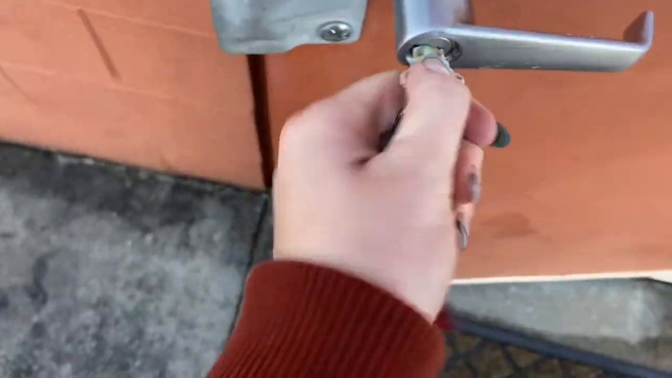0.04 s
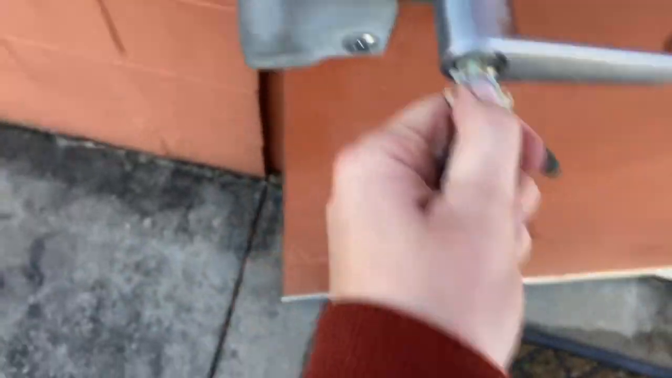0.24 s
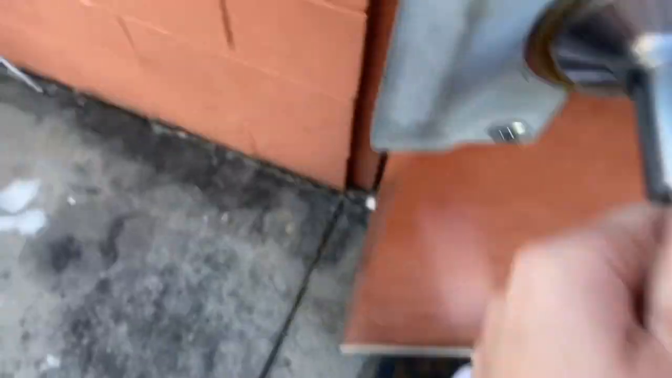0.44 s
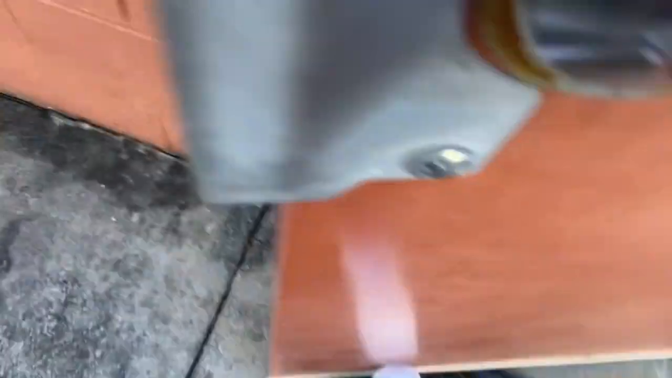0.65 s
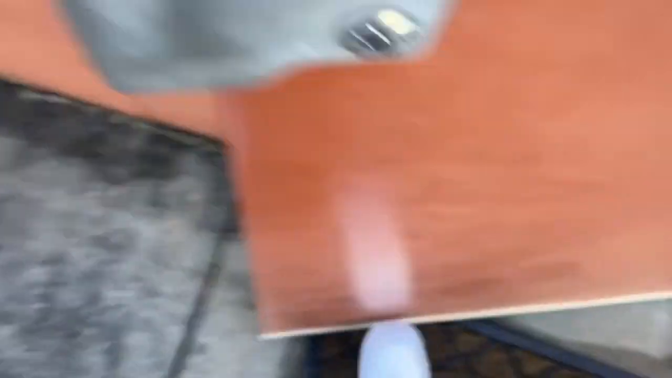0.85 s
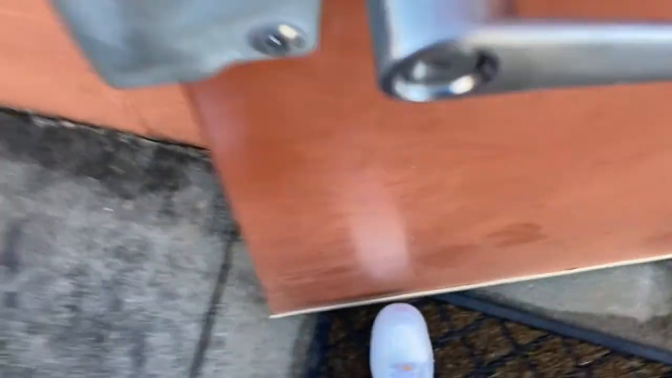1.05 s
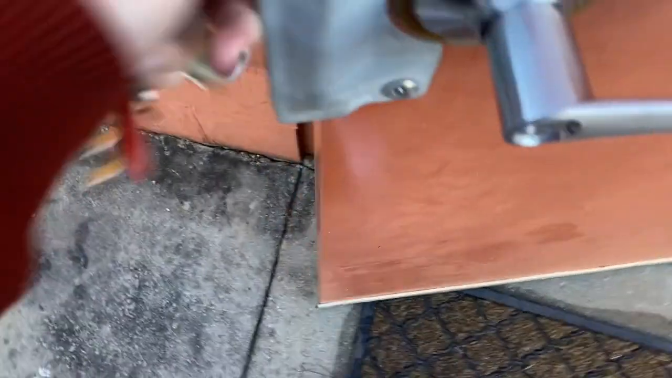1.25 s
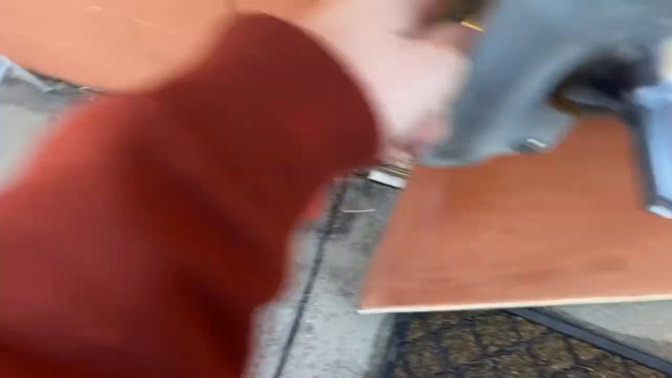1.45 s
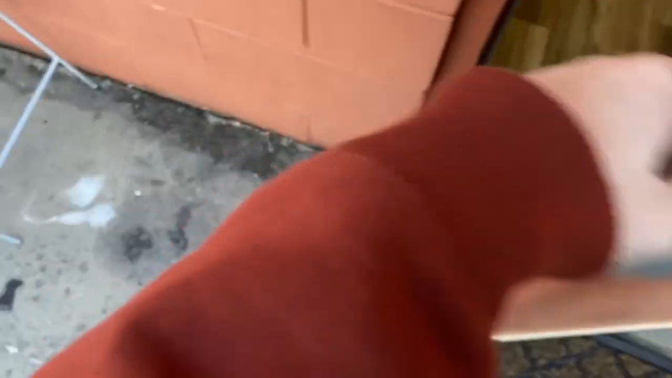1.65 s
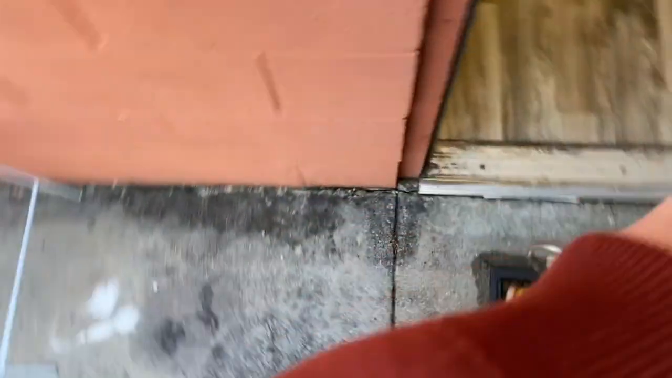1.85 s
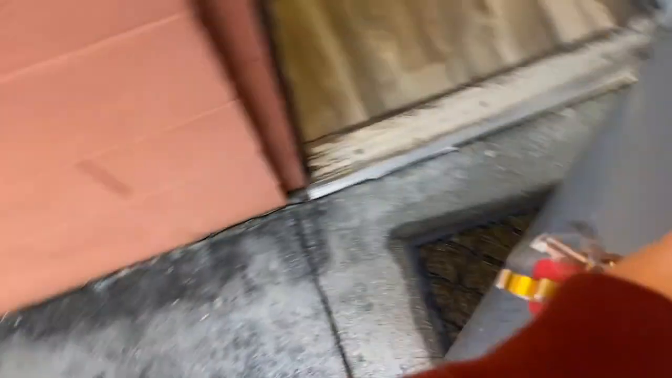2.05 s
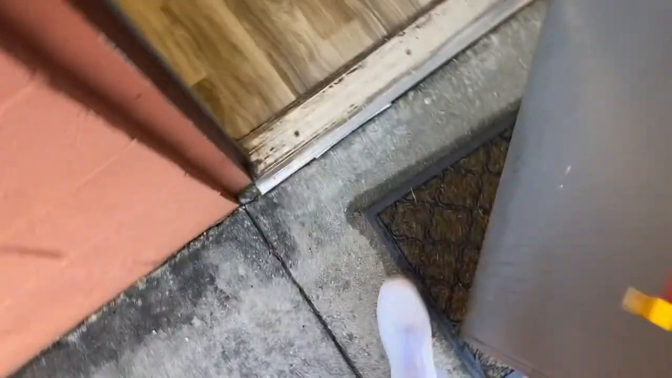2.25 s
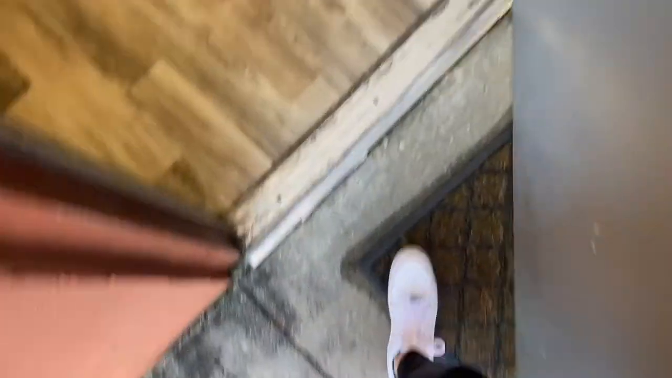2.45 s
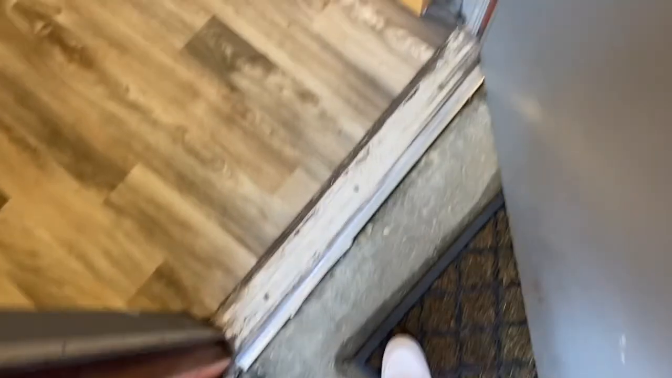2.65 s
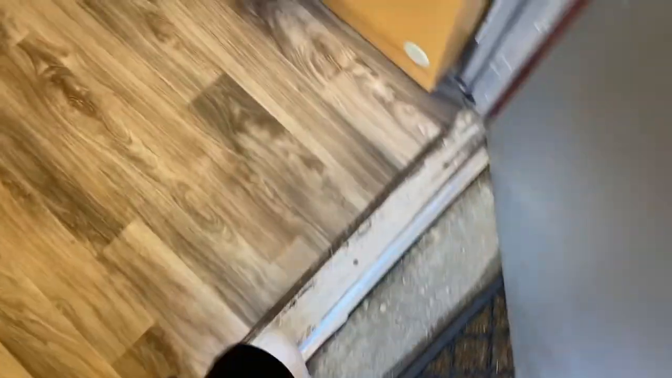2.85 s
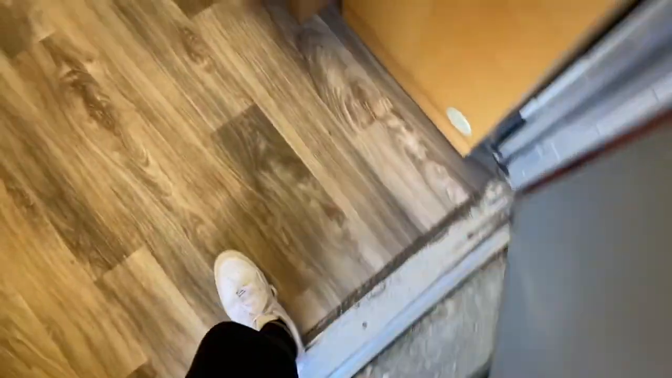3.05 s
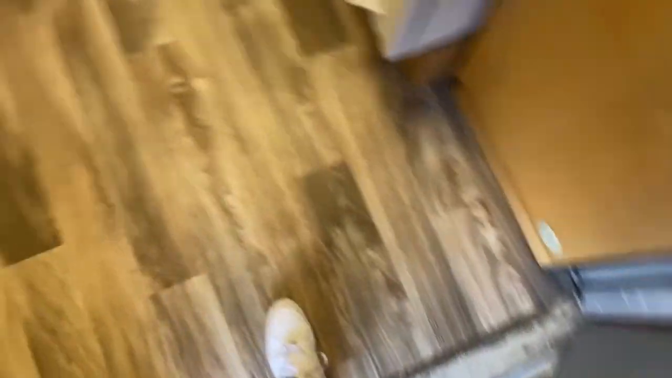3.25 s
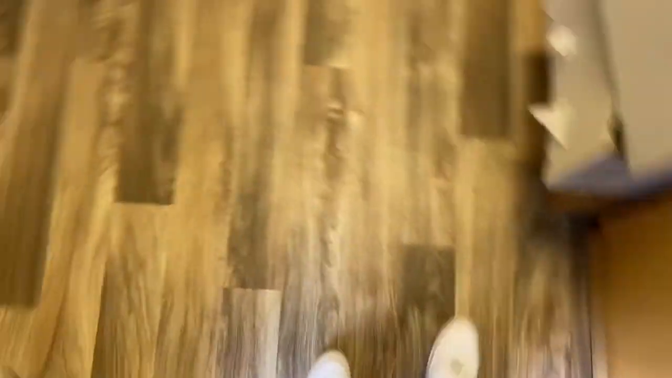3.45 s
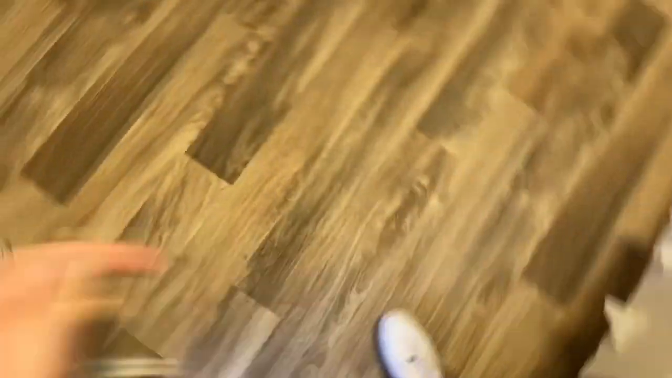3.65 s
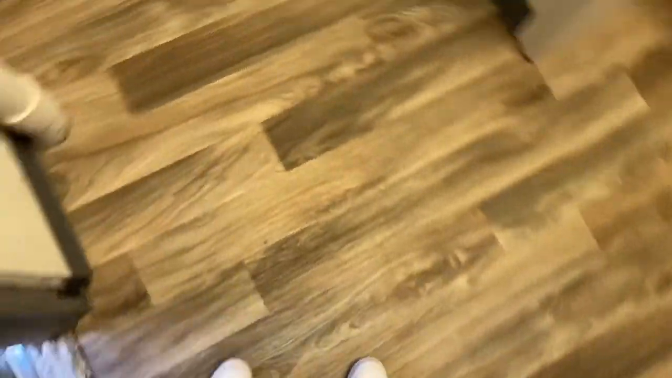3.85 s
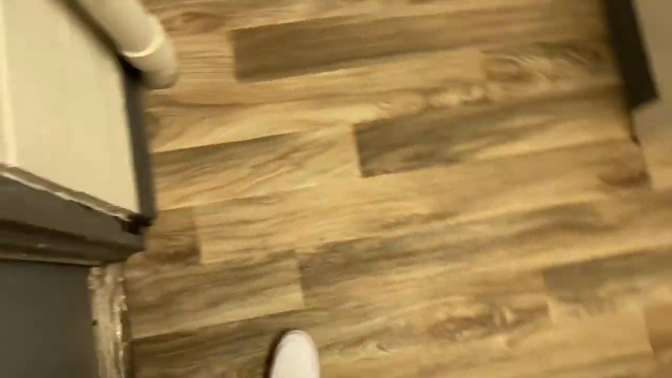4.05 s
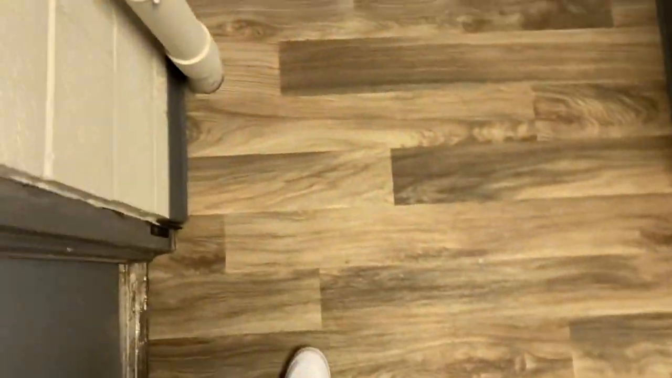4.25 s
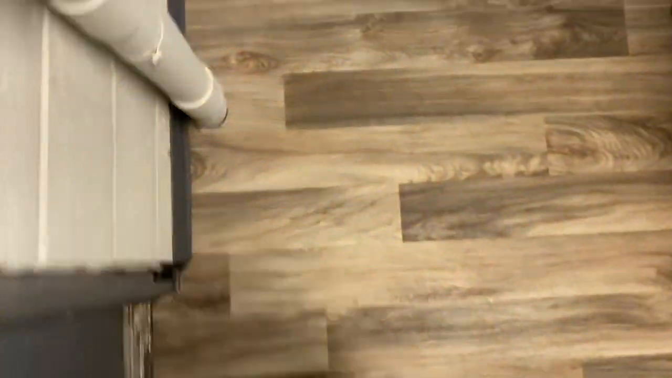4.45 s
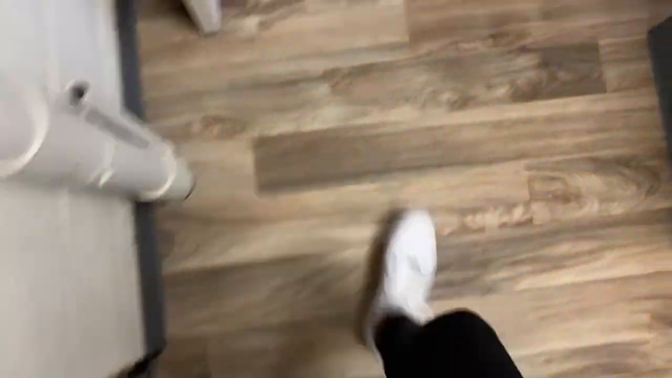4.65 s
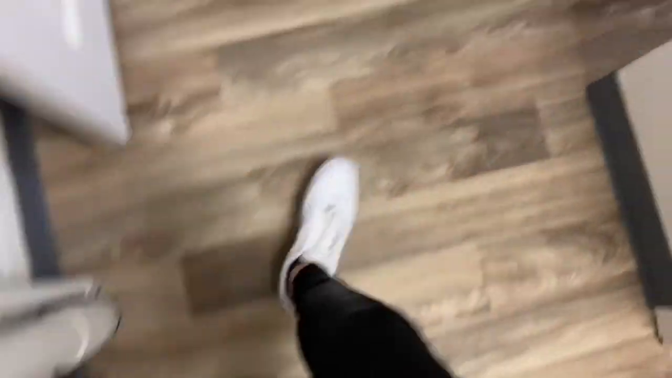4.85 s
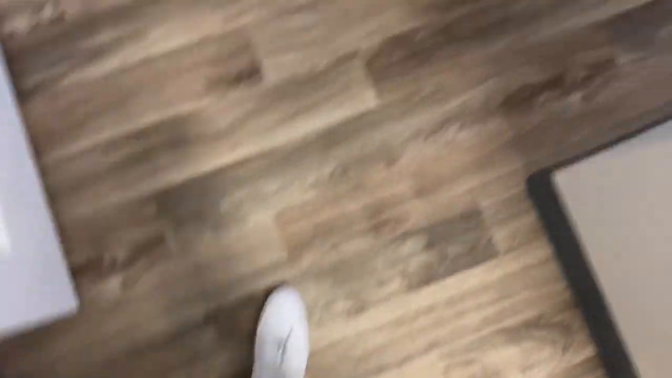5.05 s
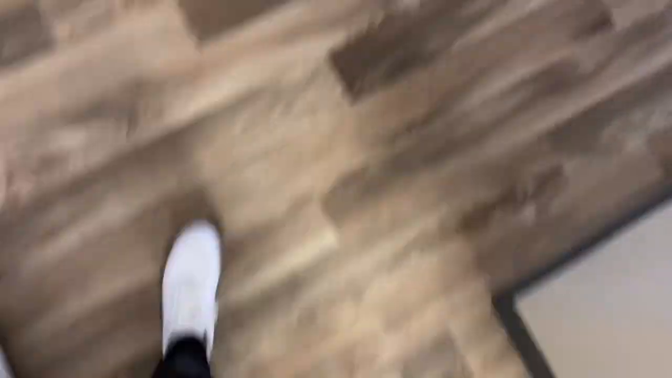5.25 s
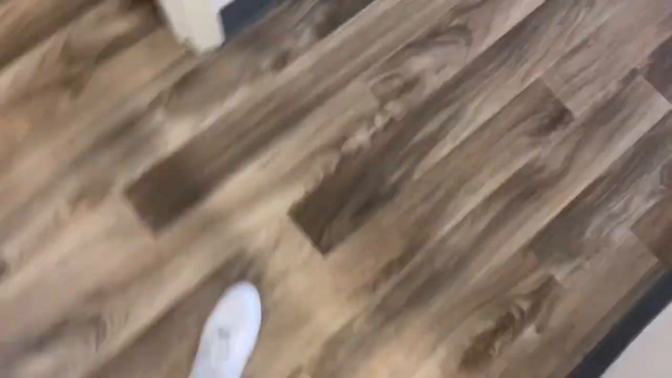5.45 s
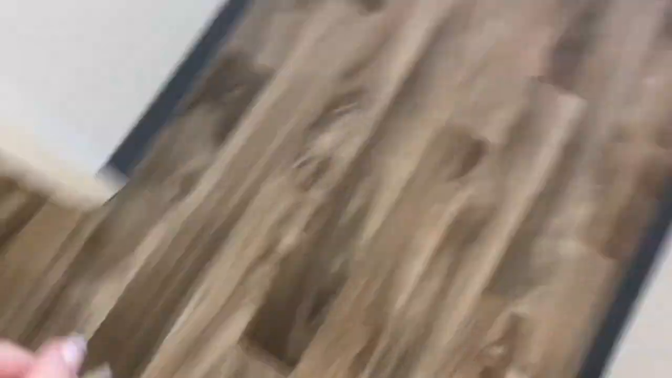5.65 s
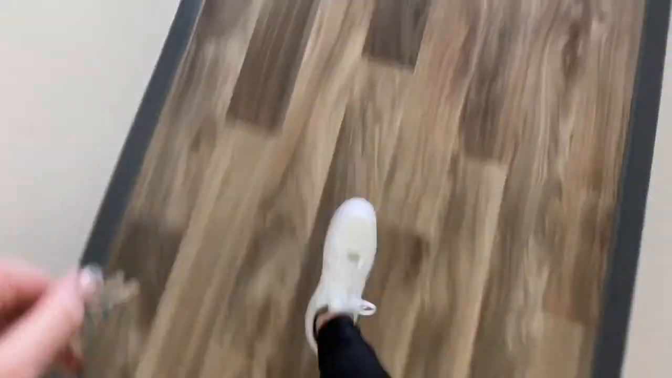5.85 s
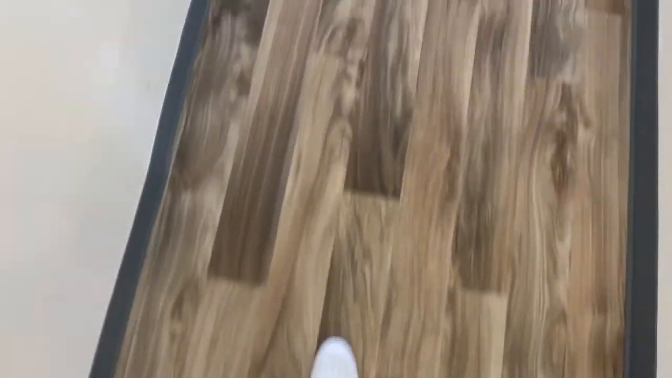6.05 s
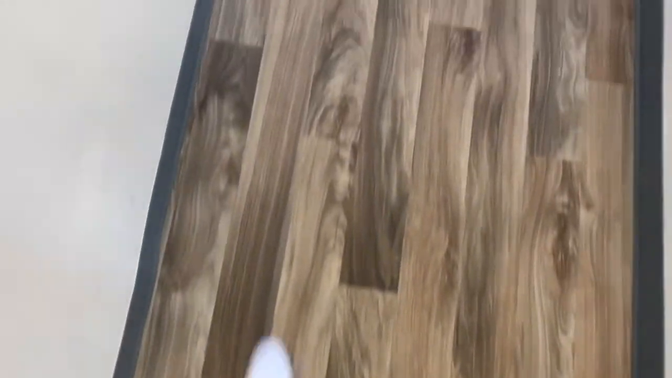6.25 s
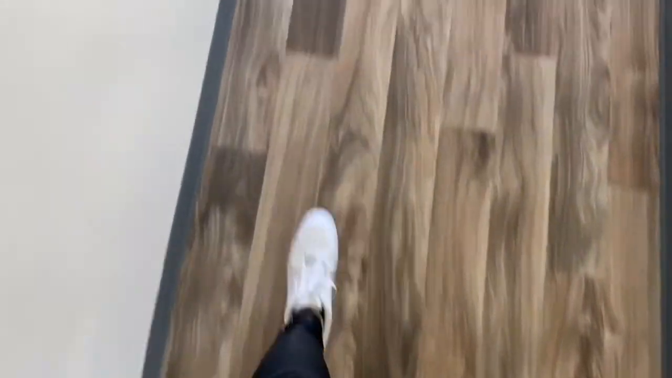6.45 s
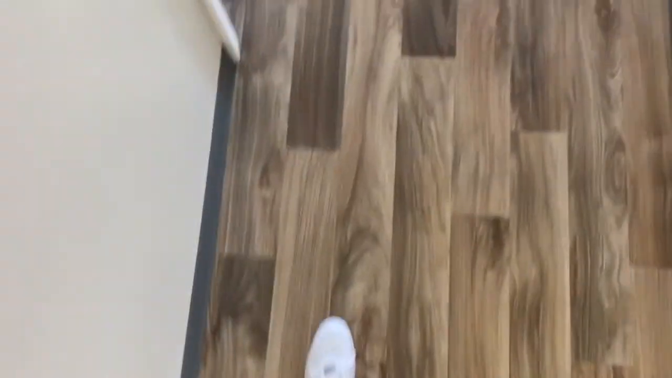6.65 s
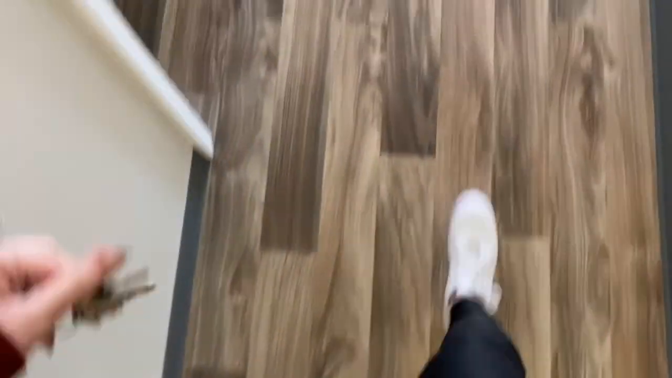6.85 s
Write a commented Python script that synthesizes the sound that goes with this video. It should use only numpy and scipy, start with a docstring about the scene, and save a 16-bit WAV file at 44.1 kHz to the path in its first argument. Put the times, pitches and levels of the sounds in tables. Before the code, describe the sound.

A key grinds and clicks out of a metal door's lock, and the lever snaps back with a sharp clack. A bunch of keys jangles brightly in a swinging hand as someone bumps over the threshold. The door slams behind them, and soft footsteps carry on down a slightly echoing hall toward a growing low hum. The close, hand-held microphone picks up rumble, brief wind and rustling clothes.

```python
"""At a metal door that leads into a hall. A key is drawn from the lock, the lever snaps back, and the
bunch of keys jangles in a swinging hand. Someone steps over the threshold, the door slams behind them,
and they walk towards a low hum. Each metal impact is a broadband contact burst followed by the free
decay of the body's modes; friction is shaped noise or a train of tiny contacts. The hall reverberates,
and two close, hand-held microphones pick up rumble as they move."""
import sys
import numpy as np
from scipy import signal
from scipy.fft import rfft, irfft, next_fast_len
from scipy.io import wavfile

SR = 44100
rng = np.random.default_rng(int(sys.argv[2]) if len(sys.argv) > 2 else 0)


def wrap_up_sound(samples):
    """Save the sound to the file named by the first command line argument, as 16-bit audio."""
    columns = np.atleast_2d(samples).T
    # keep every value between -1 and 1, then stretch to whole-number steps
    tamed = np.clip(columns, -1, 1)
    steps = np.round(tamed * 32767).astype(np.int16)
    wavfile.write(sys.argv[1], SR, steps)


N = 304725


def amp(db):
    """Decibels as an amplitude ratio; table levels are relative, and each source adds its own gain."""
    return 10 ** (np.asarray(db) / 20)

def unit(x):
    """Normalisation to rms 1."""
    return x / np.sqrt(np.mean(x ** 2) + 1e-20)

def at_hz(points, hz):
    """Interpolation on a logarithmic frequency axis."""
    freqs, values = np.transpose(points)
    return np.interp(np.log(hz + 1), np.log(freqs + 1), values)

def envelope(rows, column=1):
    """An amplitude envelope, linear in decibels between breakpoints."""
    rows = np.array(rows)
    return amp(np.interp(np.arange(N) / SR, rows[:, 0], rows[:, column]))

def swells(rows, column=2):
    """Incoherent addition: Gaussian swells sum in power."""
    t = np.arange(N) / SR
    bells = (amp(row[column]) * np.exp(-(2 * (t - row[0]) / row[1]) ** 2) for row in rows)
    return np.sqrt(sum(bell ** 2 for bell in bells))

def add(mix, start_s, sound):
    """Superposition: a sound joins the mix at its start time."""
    part = mix[:, max(round(start_s * SR), 0):][:, :sound.shape[1]]
    part += sound[:, :part.shape[1]]

def colour(x, spectrum, tilt_db=0):
    """Spectral shaping, with a tilt in dB per octave; rms 1."""
    hz = np.fft.rfftfreq(x.shape[1], 1 / SR)
    gain = amp(at_hz(spectrum, hz) + tilt_db * np.log2(hz / 500 + 0.091))
    return unit(irfft(rfft(x) * gain, x.shape[1]))

def noise(spectrum, size, tilt_db=0):
    """Two independent channels of filtered Gaussian noise."""
    return colour(rng.standard_normal((2, next_fast_len(size))), spectrum, tilt_db)[:, :size]

def hump(hz):
    """The broad spectrum of a heavily damped resonance."""
    return [(hz / 3, -18), (hz * 0.44, -5), (hz, 0), (hz * 2, -14), (hz * 8, -45)]

def flutter(hz, depth_db):
    """Random amplitude modulation, with hz new levels a second."""
    knots = rng.standard_normal(4096)
    return unit(amp(depth_db * np.interp(np.arange(N) / SR * hz, np.arange(4096), knots)))

def grains(per_s, spread_db):
    """A Poisson train of tiny contacts, most weak and a few strong; rms 1."""
    strength = amp(spread_db * np.minimum(rng.exponential(1, (2, N)), 4))
    return unit(strength * rng.choice([-1, 1], (2, N)) * (rng.random(N) < per_s / SR))

def unit_onset(x):
    """Normalisation to rms 1 over the first channel's first 30 ms."""
    return x / np.sqrt(np.mean(x[0, :SR * 3 // 100] ** 2))

def ring(modes, scatter_db=0, detune=0, damping=1):
    """Free modal decay of a body struck at a random spot; damping divides each mode's t60."""
    hz, db, t60 = np.transpose(modes)[:, :, None]
    t = np.arange(SR // 4) / SR
    spot, grip = rng.standard_normal((2, len(hz), 1))
    fade = amp(db + scatter_db * spot - 60 * damping * t / t60)
    partials = fade * np.sin(2 * np.pi * hz * (1 + detune * grip) * t)
    return unit_onset(np.array([partials.sum(0), rng.choice([-1, 1], len(hz)) @ partials]))

def softened(x, rise_s):
    """A compliant contact builds up gradually, without a click."""
    return x * (1 - np.exp(-np.arange(x.shape[1]) / SR / rise_s))

def crack(spectrum, decay_s, tail_db, tail_s):
    """A hard contact is brief, hence broadband: a burst and a slower tail; rms 1 over the first 6 ms."""
    t = np.arange(4096) / SR
    fall = np.exp(-t / decay_s) + amp(tail_db) * np.exp(-t / tail_s)
    burst = softened(noise(spectrum, len(t)), rise_s=0.00028) * fall
    return burst / np.sqrt(np.mean(burst[:, :SR * 6 // 1000] ** 2))

def chatter(sound, per_s, bounce_db, decay_s):
    """Repeated excitation: loose metal bounces at random, which blurs its ring."""
    t = np.arange(4096) / SR
    contacts = (rng.random(len(t)) < per_s / SR) * rng.standard_normal(len(t))
    bounces = contacts * amp(bounce_db) * np.exp(-t / decay_s)
    bounces[0] = 1  # the first blow
    return unit_onset(signal.fftconvolve(sound, bounces[None], axes=1))


# mains hum along the hall: time_s, level_db
HUM_LEVEL = [(0, -68), (3, -55.5), (4.3, -48), (4.8, -47), (5.3, -54), (5.8, -52), (6.5, -40), (6.91, -37)]

def hum(pitch_hz=122.5):
    """Mains hum is harmonic: a fundamental and a weak octave, wavering as the listener walks."""
    phase = 2 * np.pi * pitch_hz * np.arange(N) / SR
    tone = np.sqrt(2) * (np.sin(phase) + amp(-24.5) * np.sin(2 * phase))
    return tone * envelope(HUM_LEVEL) * flutter(hz=8.5, depth_db=-0.5)

# movement of the body and the microphones: time_s, rumble_db, sleeve_db
MOTION = [(0, -39.5, -46.5), (0.16, -32.5, -45.5), (0.28, -43, -46), (0.57, -29.5, -47), (0.78, -40.5, -40),
          (0.95, -42.5, -51.5), (1.4, -50.5, -51.5), (1.8, -38, -47), (2.1, -46.5, -47), (2.45, -50, -48),
          (2.98, -42.5, -51), (3.15, -48.5, -46), (3.4, -45.5, -53.5), (3.95, -46.5, -52),
          (4.3, -42, -51.5), (5.1, -47.5, -56.5), (6.0, -41, -57.5), (6.91, -45.5, -56)]
# gusts outdoors: centre_s, length_s, level_db
GUSTS = [(.13, 0.14, -28.5), (.61, 0.36, -34), (1.8, 0.32, -36.5), (1.97, 0.038, -35.5)]
# spectra of handling and of wind buffeting: frequency_hz, level_db
HANDLING_SPECTRUM = [(20, -28), (35, -16.5), (55, 0), (80, -0.5), (120, -6), (200, -13), (400, -31),
                     (1000, -59)]
WIND_SPECTRUM = [(50, -18), (110, 4), (170, -1.5), (300, -8.5), (600, -33.5), (1500, -56)]

def rumble():
    """Structure-borne handling noise and turbulent air reach the microphones at low frequencies."""
    handling = noise(HANDLING_SPECTRUM, N) * envelope(MOTION)
    wind = noise(WIND_SPECTRUM, N) * swells(GUSTS) * flutter(hz=40.5, depth_db=2)
    return amp(0.5) * handling + amp(-4.5) * wind

# the hand works at the door, then relaxes: time_s, cloth_db, keys_db
HAND = [(0, -55.5, -53), (0.2, -61.5, -48.5), (0.42, -56.5, -63), (0.68, -66, -65), (1.03, -51, -38),
        (1.16, -59, -53), (1.38, -55, -48), (1.65, -66, -66), (1.98, -63, -52.5), (2.45, -58, -53.5),
        (2.72, -58, -47), (2.92, -64, -71), (4.8, -64, -60), (5.7, -67.5, -74), (6.3, -69.5, -78),
        (6.91, -62, -68.5)]
# strides swish the trousers and swing the keys: centre_s, length_s, cloth_db, keys_db
STRIDES = [(3.2, 0.45, -59.5, -49), (3.85, 0.36, -74, -58), (4.2, 0.33, -55, -42.5),
           (4.55, 0.12, -55.5, -52), (5.13, 0.37, -58.5, -54.5), (5.52, 0.17, -60.5, -53),
           (6.08, 0.32, -56.5, -79), (6.52, 0.29, -59, -58.5)]
# spectra of a brushing sleeve and of hissing cloth: frequency_hz, level_db
SLEEVE_SPECTRUM = [(80, -6), (200, 5.5), (330, -2), (600, -4.5), (1000, -9.5), (1600, -18.5), (4000, -41)]
CLOTH_SPECTRUM = [(400, -21), (1200, -0.5), (2200, 6), (3500, 5.5), (5500, 3), (8000, -10), (16000, -17)]

def clothes():
    """Friction of fabric makes uneven noise that follows the arm and the strides."""
    brush = noise(SLEEVE_SPECTRUM, N) * envelope(MOTION, column=2) * flutter(hz=60.5, depth_db=4)
    movement = np.hypot(envelope(HAND), swells(STRIDES))
    hiss = noise(CLOTH_SPECTRUM, N) * movement * flutter(hz=69.5, depth_db=3.5)
    return amp(3) * brush + amp(1.22) * hiss

# reverberation time of the hall: frequency_hz, t60_s
HALL_DECAY = [(100, 0.63), (500, 0.49), (2000, 0.19), (6000, 0.13), (11000, 0.2), (16000, 0.26)]
# sound fed to the reverberant field, greater indoors: time_s, level_db
HALL_SEND = [(0, -23), (2.6, -15.5), (3.2, -7), (6.91, -16.5)]

def hall(direct):
    """Reverberation: a diffuse tail in which absorption removes the treble before the bass."""
    hz, t, bands = signal.stft(rng.standard_normal((2, SR // 2)), SR, nperseg=256)
    decay = amp(-60 * t / at_hz(HALL_DECAY, hz)[:, None])
    rise = 1 - np.exp(-t / 0.0019)
    _, tail = signal.istft(bands * decay * rise, SR, nperseg=256)
    send = direct[:1] * envelope(HALL_SEND)
    return signal.fftconvolve(send, tail / np.linalg.norm(tail[0]), axes=1)[:, :N]

# likeness of the two microphone signals: frequency_hz, correlation
PAIR_CORRELATION = [(50, 0.99), (150, 0.99), (320, 0.84), (600, 0.25), (2000, 0.3), (4000, 0.065),
                    (5600, 0.5), (7200, 1), (8700, 0.91), (10300, 0.91), (12000, 0.93), (13500, 1),
                    (15500, 0.48)]
# phase by which the left one leads: frequency_hz, lead_rad
PAIR_PHASE = [(0, -1), (330, 0.38), (950, -3.5), (1600, 0), (2400, 0.6), (5200, 7.5), (7000, 8), (7700, 9),
              (9800, 13.5), (10700, 12.5), (13200, 16), (14000, 12), (16000, 30)]

def microphone_pair(x):
    """Partial coherence: two close microphones share part of a sound, shifted in phase."""
    size = next_fast_len(N + 64)
    hz = np.fft.rfftfreq(size, 1 / SR)
    left, other = rfft(x, size)
    correlation = np.clip(at_hz(PAIR_CORRELATION, hz), 0, 1)
    shared = correlation * left * np.exp(-1j * at_hz(PAIR_PHASE, hz))
    right = shared + np.sqrt(1 - correlation ** 2) * other
    return irfft(np.array([left, right]), size)[:, :N]

def thump(db, hz, t60):
    """A soft blow excites a damped resonance within a cycle; the deepest are the purest."""
    t = np.arange(SR // 3) / SR
    swell = (1 - np.exp(-(t * hz) ** 2)) * amp(db + 10 - 60 * t / t60)
    rough = min(hz / 500, 1)
    return swell * ((1 - rough) * np.sin(2 * np.pi * hz * t) + rough * noise(hump(hz), len(t)))

# footfalls: start_s, level_db, pitch_hz
FOOTFALLS = [(4.275, -18, 73.8), (5.367, -30, 136), (5.896, -30, 177), (6.417, -28, 154)]
# heels on the hard floor: start_s, level_db, pitch_hz, t60_s
HEEL_TAPS = [(4.753, -34.5, 470, 0.026), (6.424, -32.5, 241, .05)]

def footsteps(t60_cycles=8.9):
    """Impacts on the floor: footfalls decay at constant Q, so deeper ones last longer; heels tap."""
    out = np.zeros((2, N))
    for start, db, hz in FOOTFALLS:
        add(out, start, thump(db, hz, t60_cycles / hz))
    for start, db, hz, t60 in HEEL_TAPS:
        add(out, start, thump(db, hz, t60))
    return out

# hand and arm bump the door and the microphones: start_s, level_db, middle_pitch_hz
BUMPS = [(0.059, -25, 275), (0.113, -33, 620), (0.172, -29.5, 258), (0.211, -31, 246), (0.28, -36, 523),
         (0.43, -31, 320), (0.53, -27.5, 295), (0.551, -25.5, 513), (0.59, -26.5, 330), (0.631, -25.5, 160),
         (0.666, -31, 400), (0.697, -24, 370), (0.816, -35, 334), (0.964, -32, 430), (1.136, -27, 444),
         (1.562, -32.5, 111), (1.651, -28.5, 400), (1.728, -32.5, 238.3), (1.762, -36.5, 273),
         (1.831, -29, 227), (1.953, -32.5, 405), (2.264, -35, 517), (2.342, -30, 503), (3.087, -25, 270),
         (3.106, -23.5, 233)]

def bumps(cycles=5.07, fall_octaves=1.5):
    """Soft impacts are narrow in bandwidth: dull pulses of a few cycles, falling in pitch."""
    out = np.zeros((2, N))
    for start, db, hz in BUMPS:
        size = round(cycles / hz * SR)
        progress = np.arange(size) / size
        phase = 2 * np.pi * np.cumsum(hz * 2 ** (fall_octaves * (0.5 - progress))) / SR
        tone = np.sin(phase + 2 * np.pi * rng.random((2, 1)))
        add(out, start, amp(db - 1.5) * np.sin(np.pi * progress) ** 2 * tone)
    return out

# dull rubs and scrapes of hand, sleeve, lever and sole: start_s, length_s, level_db, pitch_hz
RUBS = [(0.601, .13, -43, 617), (0.819, .07, -44.5, 560), (1.184, 0.11, -41.5, 610),
        (4.487, 0.2, -45.5, 470)]
# soles tick on the floor: start_s, level_db, t60_s
SCUFFS = [(3.625, -49.5, 0.032), (4.756, -48.5, 0.016), (5.476, -43.5, 0.04), (5.49, -39.5, 0.097),
          (6.005, -44, 0.07), (6.53, -40.5, 0.05), (6.554, -38.5, 0.054)]
# spectrum of those ticks: frequency_hz, level_db
SOLE_SPECTRUM = [(300, -9), (900, -4.5), (1600, 3.5), (3000, -1), (6000, -11), (14000, -28.5)]

def rubs_and_scuffs():
    """Sliding friction: sustained rubs give a dull band of noise, brief scuffs a brighter burst."""
    out, t = np.zeros((2, N)), np.arange(SR // 3) / SR
    for start, length, db, hz in RUBS:
        size = round(length * SR)
        add(out, start, amp(db) * noise(hump(hz), size) * signal.windows.tukey(size, 0.5))
    for start, db, t60 in SCUFFS:
        add(out, start, amp(db + 2.5 - 60 * t / t60) * noise(SOLE_SPECTRUM, len(t)))
    return out

# the door meets its frame: start_s, level_db
SLAMS = [(4.002, -28.5), (4.025, -30)]
# modes of the door leaf: pitch_hz, level_db, t60_s
DOOR_MODES = [(75, 2, .17), (242, -2, .3), (993, -3, .2), (1883, -6, .2), (1936, -5, .22), (2078, -2, .15),
              (2230, -4, .15), (2669, -6, .2), (2964, -9, .25), (4370, -15, .16), (4948, -12, .18),
              (5546, -13, .18)]
# dull blows on door and threshold: start_s, level_db, t60_s, tilt_db_per_octave
KNOCKS = [(.802, -31, 0.062, 4), (3.029, -34, 0.039, 2.5), (3.044, -26, 0.045, -2.5),
          (3.073, -34.5, 0.097, 1.5), (3.09, -24, 0.086, 0.5), (3.112, -28, 0.13, 1),
          (3.165, -38, 0.24, 0.5), (3.225, -39.5, 0.084, 1), (4.006, -29.5, 0.51, 3),
          (4.028, -28, .06, 5.5)]
# spectrum of those blows before the tilt: frequency_hz, level_db
PANEL_SPECTRUM = [(60, -22), (130, -4.5), (200, 1.5), (290, -2.5), (400, -5.5), (620, -7.5), (780, -10.5),
                  (970, -2.5), (1300, -22), (2200, -22), (5000, -31.5), (12000, -64)]

def door(buzz_db=-14.5, buzz_t60_s=1):
    """Plate vibration: the slammed leaf rings and its fittings buzz; duller blows shake the panels."""
    out, t = np.zeros((2, N)), np.arange(SR // 2) / SR
    for start, db in SLAMS:
        add(out, start, amp(db) * ring(DOOR_MODES, detune=0.0034))
        buzz = noise(CLOTH_SPECTRUM, len(t)) + amp(-0.5) * noise(SLIDE_SPECTRUM, len(t))
        buzz *= flutter(hz=109, depth_db=4)[:len(t)]
        add(out, start, amp(db + buzz_db - 60 * t / buzz_t60_s) * buzz)
    for start, db, t60, tilt_db in KNOCKS:
        blow = softened(noise(PANEL_SPECTRUM, len(t), tilt_db), rise_s=0.0019)
        add(out, start, amp(db + 3.5 - 60 * t / t60) * blow)
    return out

# the blade grinds in the keyway: centre_s, length_s, level_db
GRINDS = [(0.767, 0.042, -32), (0.81, 0.034, -45), (0.87, .05, -48), (0.935, 0.026, -52),
          (0.978, 0.046, -43)]
# teeth drag past the pins: start_s, level_db
PIN_CLICKS = [(0.7303, -19.5), (0.7326, -17), (0.7427, -22), (0.7443, -18), (0.7525, -22), (0.759, -27),
              (0.765, -27.5), (0.774, -28), (0.793, -35.5)]
# spectra of the grinding and of a pin's click: frequency_hz, level_db
GRIND_SPECTRUM = [(400, -3.5), (900, 1), (1500, -4), (2400, -1.5), (3200, -1), (5000, 2.5), (6200, -3),
                  (7500, -13), (11100, -2), (13500, -5.5), (15500, -2), (16300, -20.5)]
PIN_SPECTRUM = [(500, -8), (1800, -11.5), (3000, -9.5), (4400, -8.5), (5050, 4), (6000, -7.5), (8000, -0.5),
                (10200, -1), (11100, 5), (12500, -1), (15600, -4.5), (16300, -21)]

def keyway():
    """Friction and impact: the withdrawn blade grinds while the pins click over its teeth."""
    out = colour(grains(per_s=1600, spread_db=4), GRIND_SPECTRUM) * swells(GRINDS)
    for start, db in PIN_CLICKS:
        add(out, start, amp(db - 3) * crack(PIN_SPECTRUM, decay_s=0.0012, tail_db=-22.5, tail_s=0.012))
    return out

def rebounds(start_s, kept, count=6, first_wait_s=0.0113, wait_ratio=0.99):
    """Inelastic collisions: the time and gain of a blow and of its ever quicker, weaker rebounds."""
    index = np.arange(count)
    waits = first_wait_s * wait_ratio ** index
    times = start_s + np.cumsum(waits) - waits
    gains = np.clip(kept, 0, 0.9) ** index
    return [(time, gain) for time, gain in zip(times, gains) if gain > 0.02]

# spectrum of steel on steel inside the lock: frequency_hz, level_db
STEEL_SPECTRUM = [(300, -22), (1500, -15), (2100, -4), (3000, -1.5), (4200, -1), (6000, -3.5), (8000, -4.5),
                  (14000, -31)]

def steel_resonance(hz, peak_db=10.5, width_octaves=0.16):
    """A struck part's own resonance raises one peak in the contact spectrum."""
    freqs = np.geomspace(200, 16000, 128)
    peak = peak_db * np.exp(-(np.log2(freqs / hz) / width_octaves) ** 2)
    return np.transpose([freqs, at_hz(STEEL_SPECTRUM, freqs) + peak])

# bolt, lever and latch snap home: start_s, tick_db, clack_db, rebound_ratio, clack_pitch_hz
SNAPS = [(0.5493, -51, -34, 0, 2980), (0.625, -48, -50, 0.06, 5030), (0.8026, -46, -33.5, 0.1, 2720),
         (0.8414, -47.5, -40, 0.1, 3460), (0.8974, -34, -24, 0, 3230), (0.9652, -40, -29, 0.19, 4330),
         (1.2649, -32, -32.5, 0.06, 5100), (1.2902, -14, -16.5, 0, 2170), (1.7888, -39, -32.5, 0.06, 3500),
         (2.0273, -34, -30.5, 0.08, 4900), (3.982, -40.5, -43.5, 1, 3500), (4, -18, -18, 0, 2170),
         (4.005, -17.5, -15.5, 0.05, 4770), (4.0262, -20, -29, .3, 5500), (4.0805, -49, -31.5, 0.16, 4100),
         (4.164, -36, -32.5, 0.1, 4400)]
# modes of the lock case: pitch_hz, level_db, t60_s
CASE_MODES = [(2110, -1, 0.072), (2445, 0, 0.06), (3230, -6.5, 0.0453), (3680, -5, 0.076),
              (4380, -6.5, 0.062), (4800, -5.5, .06), (5280, -1.5, 0.037), (5630, -6, 0.055),
              (6030, -1, .07), (6260, -14, 0.066), (7310, 2, .04)]
# spectrum of a bright metal tick, in lock and keys alike: frequency_hz, level_db
TICK_SPECTRUM = [(3000, -15), (6000, -8), (7500, 2.5), (9500, 2.5), (11200, 7), (13500, 2), (15600, -14),
                 (16500, -24)]

def lock():
    """Impact excitation: steel parts snap home, rebound and set the lock case ringing."""
    out = np.zeros((2, N))
    for start, tick_db, clack_db, kept, hz in SNAPS:
        for time, gain in rebounds(start, kept):
            case = ring(CASE_MODES, scatter_db=2.5, detune=0.025)
            tick = crack(TICK_SPECTRUM, decay_s=0.0023, tail_db=-16, tail_s=0.01)
            clack = crack(steel_resonance(hz), decay_s=0.0025, tail_db=-17.5, tail_s=0.02)
            add(out, time, gain * (amp(tick_db - 5) * tick + amp(clack_db - 2.5) * clack))
            add(out, time, gain * amp(clack_db - 14) * case)
    return out

# the lever hits its stop and drops back on it: start_s, level_db, tilt_db_per_octave
LEVER_STOPS = [(1.2926, -24, 0.5), (1.3317, -34.5, -5.5)]
# modes of the lever: pitch_hz, level_db, t60_s
LEVER_MODES = [(403, 1.5, 0.12), (464, -3, 0.09), (540, -3, .05), (583, 1, 0.075), (650, -3, 0.05),
               (970, -14, 0.15), (1890, -9, .09), (2105, -3, 0.09), (2320, -4, 0.08), (10866, 13, 0.035)]

def lever():
    """The sprung lever clunks on its stop; the softer second contact excites the high modes less."""
    out = np.zeros((2, N))
    lowest_hz = LEVER_MODES[0][0]
    for start, db, tilt_db in LEVER_STOPS:
        modes = [(hz, level + tilt_db * np.log2(hz / lowest_hz), t60) for hz, level, t60 in LEVER_MODES]
        add(out, start, amp(db) * softened(ring(modes), rise_s=0.00086))
    return out

# the ring or a large key swings clear and sings: start_s, level_db, pitch_hz
KEY_NOTES = [(0.17, -50, 4760), (2.385, -46, 2870), (3.295, -44, 6050), (4.205, -42.5, 2850),
             (4.325, -47, 3150), (4.75, -53.5, 3605), (5.28, -56, 6060), (6.482, -49.5, 6010)]

def singing_keys(t60_s=0.25):
    """Beating: two close modes interfere as each soft note dies."""
    out = np.zeros((2, N))
    for start, db, hz in KEY_NOTES:
        pair = ring([(hz, 0, t60_s), (hz * 1.008, -7, t60_s)])
        add(out, start, amp(db) * softened(pair, rise_s=0.004))
    return out

# one key swings free until it is caught: start_s, level_db, free_s
PINGS = [(0.1583, -41, 0.071), (1.0423, -28.5, 0.035)]
# modes of that key: pitch_hz, level_db, t60_s
FREE_KEY_MODES = [(4262, -16, .22), (6290, -15, .14), (7500, -22, .14), (8990, -11, .12), (9881, 0, .2),
                  (9960, -10, .1), (11880, -14, .16), (13300, -15, .16), (14720, -9, .12)]

def free_key(caught_t60_s=0.16, buzz_db=-8):
    """Contact damping: a free key rings and buzzes against the ring, then dies faster once caught."""
    out = np.zeros((2, N))
    for start, db, free_s in PINGS:
        tone = chatter(ring(FREE_KEY_MODES), per_s=600, bounce_db=-19, decay_s=0.03)
        t = np.arange(tone.shape[1]) / SR
        contacts = grains(per_s=1490, spread_db=3)[:, :len(t)]
        buzz = colour(contacts, TICK_SPECTRUM) * amp(buzz_db) * np.exp(-t / 0.027)
        add(out, start, (tone + buzz) * amp(db - 60 * np.maximum(t - free_s, 0) / caught_t60_s))
    return out

def faint_clinks(per_s=8.6, level_db=-0.5, spread_db=3.5):
    """A Poisson process of light knocks of key on key."""
    hits = (rng.random(N) < per_s / SR) * amp(level_db + spread_db * rng.uniform(-0.83, 1, N))
    tick = crack(TICK_SPECTRUM, decay_s=0.0023, tail_db=-8.5, tail_s=0.0097)
    clack = crack(CLACK_SPECTRUM, decay_s=0.0017, tail_db=1, tail_s=0.029)
    return signal.oaconvolve(hits[None], tick + amp(-1.5) * clack, axes=1)[:, :N]

# spectrum of key sliding on key: frequency_hz, level_db
SLIDE_SPECTRUM = [(2000, -30), (6000, -14), (8500, -5.5), (10000, -1), (11100, -10), (12500, 0.5),
                  (14000, -7.5), (15600, -14.5), (16300, -25.5)]
# modes of the loose bunch, before added damping: pitch_hz, level_db, t60_s
BUNCH_MODES = [(2840, -24, 0.2), (4060, -20.5, 0.18), (6010, -22, 0.3), (8320, -6.5, 0.16),
               (9100, -14, 0.11), (9550, -8, 0.15), (11100, -10, 0.068), (11030, 0, 0.13), (11980, -1, 0.2),
               (12600, -7, .1), (14850, -7, 0.15), (15300, -6, 0.077), (15730, 1.5, .17)]

def sliding_keys():
    """Micro-impacts: as hand and strides shake the bunch, tiny contacts hiss and excite its modes."""
    shaking = np.hypot(envelope(HAND, column=2), swells(STRIDES, column=3))
    sliding = colour(grains(per_s=1500, spread_db=5.5), SLIDE_SPECTRUM)
    taps = grains(per_s=110, spread_db=5.5)
    tinkle = unit(signal.oaconvolve(taps, ring(BUNCH_MODES, damping=1.9), axes=1)[:, :N])
    return (amp(-7.5) * sliding + amp(-5) * tinkle + faint_clinks()) * shaking

# keys tumble without a hard knock: centre_s, length_s, level_db
TUMBLES = [(0.85, .03, -45), (0.995, 0.066, -45), (2.385, 0.024, -46), (2.425, 0.033, -48),
           (2.76, 0.021, -46.5), (2.885, 0.023, -52.5), (3.285, 0.049, -42.5), (3.745, 0.021, -49),
           (4.555, 0.033, -51), (4.885, 0.033, -57), (5.024, .012, -49), (5.29, .03, -47),
           (6.452, 0.019, -52), (6.554, 0.0095, -49), (6.725, 0.012, -46), (6.873, 0.018, -43)]

def jostling(level_db=-2.5, rise_s=0.002, fall_s=0.013):
    """The rattle's envelope, summed in power: keys close in before each clink, settle, and tumble."""
    t = np.arange(-SR // 50, SR // 8) / SR
    shape = np.exp(np.minimum(t / rise_s, -t / fall_s))
    power = np.zeros((1, N))
    for start, _, _, ring_db, _ in CLINKS:
        add(power, start + t[0], (amp(ring_db + level_db) * shape[None]) ** 2)
    return np.sqrt(power[0] + swells(TUMBLES) ** 2)

# the bright rattle's colour, with narrow dips near 7.3 and 13.6 kHz: frequency_hz, level_db
RATTLE_COLOUR = [(4000, -10), (6000, -6), (7300, -19.5), (8500, -2.5), (9800, -3), (11100, 2), (12200, 2),
                 (13600, -14.5), (14900, -3), (15700, 4.5), (16400, -16)]

def rattling_keys(key_count=10, mode_count=5, t60_s=0.07):
    """Random excitation: keys in loose contact tap each other, each ringing at its own frequencies."""
    out = np.zeros((2, N))
    for _ in range(key_count):
        key = ring([(hz, 0, t60_s) for hz in rng.uniform(4000, 16200, mode_count)])[:, :4096]
        out += signal.oaconvolve(grains(per_s=38, spread_db=4), key, axes=1)[:, :N]
    return colour(out, RATTLE_COLOUR) * jostling()

def struck_key(hz, t60_s=0.1, neighbour_db=-9, neighbour_t60_s=0.07, bunch_db=-3.5):
    """Coupled vibration: a key rings at its own pitch, and random neighbours and the bunch answer."""
    pitches = rng.uniform(5000, 16000, 12)
    neighbours = [(f, neighbour_db + at_hz(RATTLE_COLOUR, f), neighbour_t60_s) for f in pitches]
    keys = ring([(hz, 0, t60_s), (hz * 1.009, -5, t60_s)] + neighbours)
    return keys + amp(bunch_db) * ring(BUNCH_MODES, scatter_db=4, detune=0.0035, damping=1.2)

# the loudest knocks of key on key: start_s, tick_db, clack_db, ring_db, pitch_hz
CLINKS = [(0.093, -44, -45.5, -52.5, 11200), (0.158, -38, -39, -37, 13400), (0.32, -47, -45, -49, 9000),
          (0.4653, -40, -50.5, -43, 11600), (0.535, -46.5, -46, -53, 7840), (0.8711, -27, -41, -39, 11400),
          (0.9429, -42, -45.5, -39.5, 15200), (1.3725, -32, -57.5, -48.5, 11200),
          (1.4133, -38, -44, -48, 13780), (1.5026, -29, -59.5, -40, 13350),
          (1.7707, -31.5, -39.5, -57.5, 5860), (1.8281, -26.5, -32.5, -31, 11170),
          (1.876, -49, -43.5, -47.5, 10900), (1.9107, -35, -38, -52, 15760),
          (2.012, -43.5, -51.5, -60, 5300), (2.0454, -14, -40, -29, 15590),
          (2.055, -24, -29.5, -41.5, 11000), (2.0843, -33.5, -33.5, -52, 10940),
          (2.18, -35, -45, -47.5, 8900), (2.1934, -27, -31, -40, 9640), (2.245, -41, -38.5, -54, 5420),
          (2.293, -45, -48, -62, 15680), (2.3589, -42, -38.5, -46.5, 10900), (2.417, -47, -34, -40, 8300),
          (2.529, -40, -41.5, -61, 12580), (2.541, -33.5, -46, -39.5, 12500),
          (2.6028, -42, -44, -44, 12100), (2.707, -28.5, -36.5, -46.5, 11000),
          (2.722, -49, -58, -60, 11000), (2.9, -52, -49.5, -48.5, 11700), (3.087, -44, -43, -37.5, 12580),
          (3.308, -38, -48, -30.5, 14900), (3.336, -47, -37.5, -43, 12020), (3.4205, -43, -63, -48, 12530),
          (3.464, -35.5, -49, -55, 5940), (3.498, -44.5, -40.5, -52, 14730),
          (3.667, -44.5, -39.5, -65, 14810), (3.789, -46, -47.5, -61, 13870),
          (3.803, -44, -49, -44.5, 11890), (3.86, -40, -43.5, -51, 11890),
          (3.9286, -42.5, -46, -53.5, 12230), (4.004, -31, -42, -29, 11800),
          (4.027, -27.5, -44, -31.5, 14700), (4.1438, -50, -55, -35.5, 11150),
          (4.298, -23, -41, -32.5, 15730), (4.35, -39.5, -43.5, -41.5, 11770),
          (4.5194, -46.5, -56, -51, 9400), (4.6729, -54, -63, -39.5, 10750),
          (4.91, -41, -48.5, -48.5, 15700), (4.92, -38, -54, -43, 11150), (5.035, -34, -53, -45, 14800),
          (5.15, -51, -48, -51, 6270), (5.231, -43, -52, -60, 7410), (5.2604, -33, -55, -38, 8370),
          (5.274, -44.5, -60, -42.5, 11800), (6.357, -38, -61, -41.5, 11900), (6.459, -37, -64, -38, 11980),
          (6.669, -28.5, -48.5, -52, 12060), (6.71, -40, -51, -43.5, 11070),
          (6.8595, -31, -44.5, -40.5, 11040)]
# spectrum of their duller clack: frequency_hz, level_db
CLACK_SPECTRUM = [(300, -10), (1200, -8.5), (2100, -2.5), (3000, -2), (4200, 1), (6000, 1), (8000, -5.5),
                  (14000, -33)]
# modes of the key ring and large keys, before added damping: pitch_hz, level_db, t60_s
KEY_RING_MODES = [(2920, 1, 0.25), (3670, -3, 0.11), (3995, -2, 0.12), (4950, -5, 0.078), (5160, -9, 0.071),
                  (6070, -0.5, 0.12)]

def clinking_keys():
    """Transient and free decay: each collision ticks and clacks, leaving keys and key ring vibrating."""
    out = np.zeros((2, N))
    for start, tick_db, clack_db, ring_db, hz in CLINKS:
        tick = crack(TICK_SPECTRUM, decay_s=0.00199, tail_db=-20.5, tail_s=0.01)
        clack = crack(CLACK_SPECTRUM, decay_s=0.00092, tail_db=-13.5, tail_s=0.022)
        key_ring = ring(KEY_RING_MODES, scatter_db=5, detune=0.09, damping=1.5)
        key = chatter(struck_key(hz), per_s=500, bounce_db=-8, decay_s=0.016)
        add(out, start, amp(tick_db - 6.5) * tick + amp(clack_db - 3) * clack)
        add(out, start, amp(clack_db - 17) * key_ring)
        add(out, start, amp(ring_db - 2.5) * key)
    return out


def scene():
    """Superposition: metal and footsteps excite the hall; clothes, rumble and hum lie behind them."""
    keys = clinking_keys() + free_key() + sliding_keys() + rattling_keys() + singing_keys()
    metal = keys + keyway() + lock() + lever() + door()
    direct = metal + footsteps() + bumps() + rubs_and_scuffs()
    return microphone_pair(direct + hall(direct) + clothes() + rumble()) + hum()

def record(dry):
    """Band limiting: a linear-phase low-pass filter removes the highest treble."""
    cutoff_hz = 16350
    taps = signal.firwin(255, cutoff_hz, window=("kaiser", 9), fs=SR)
    return signal.oaconvolve(dry, taps[None], "same")


dry = scene()
out = record(dry)
wrap_up_sound(out)
```